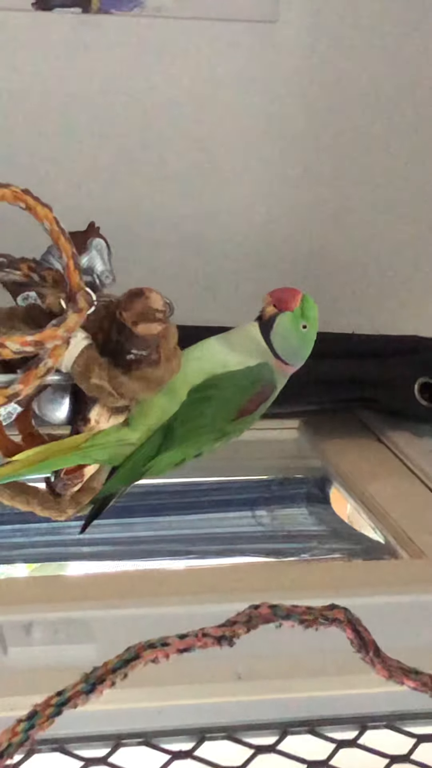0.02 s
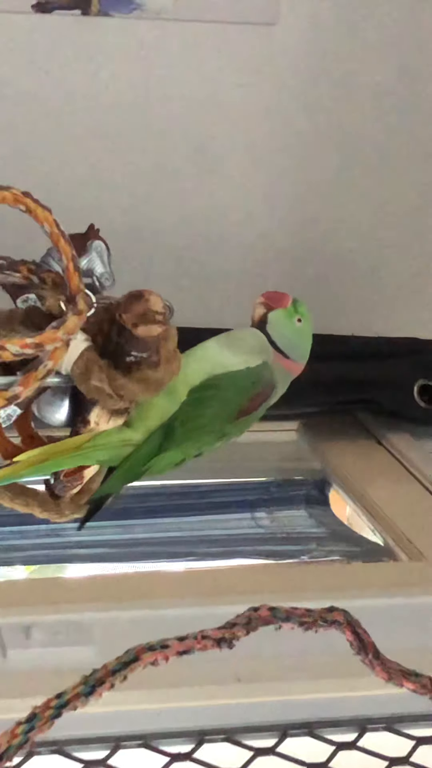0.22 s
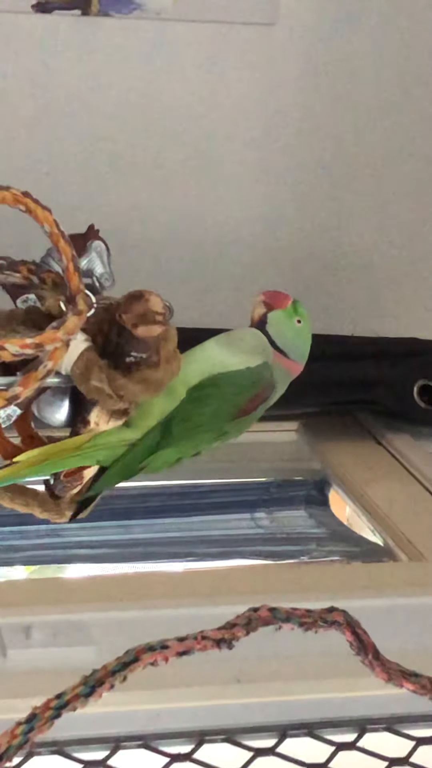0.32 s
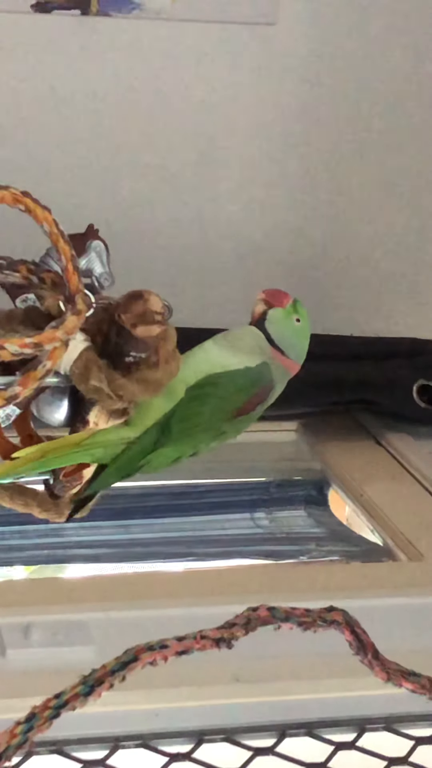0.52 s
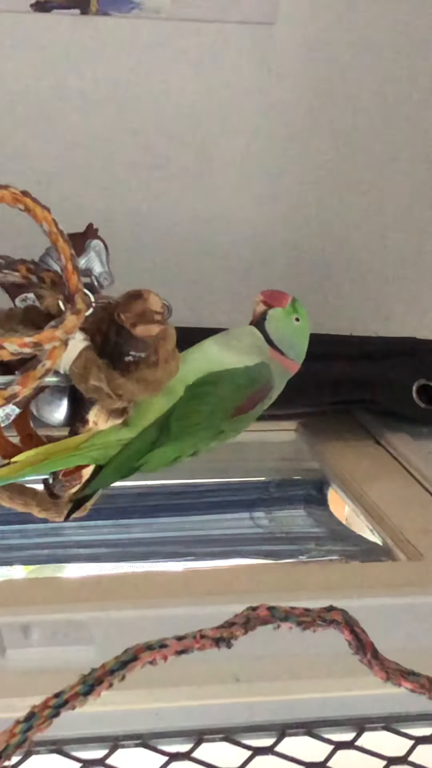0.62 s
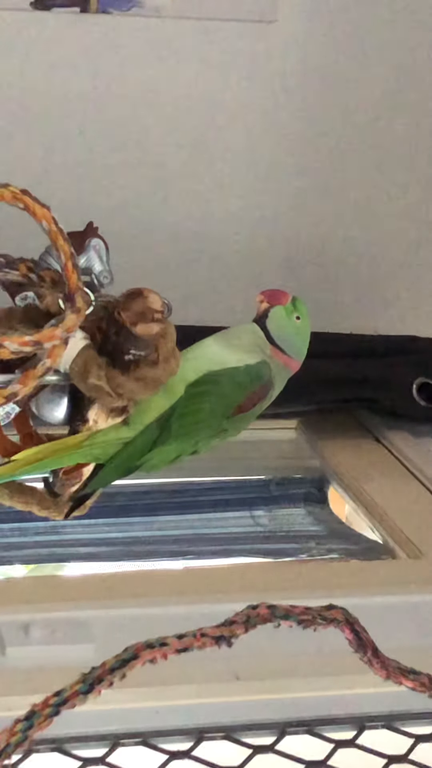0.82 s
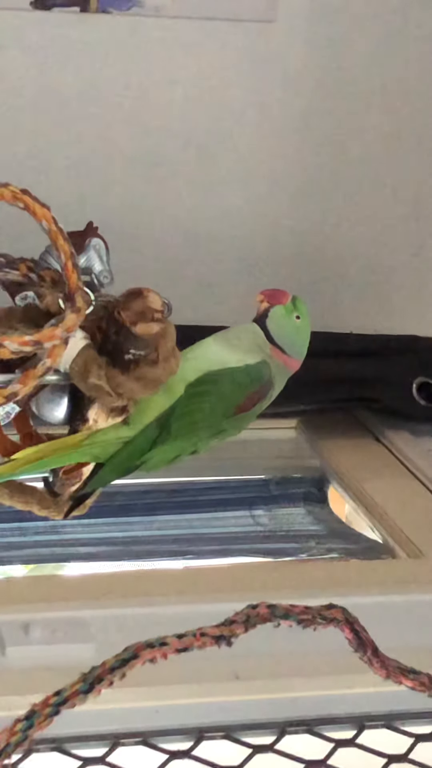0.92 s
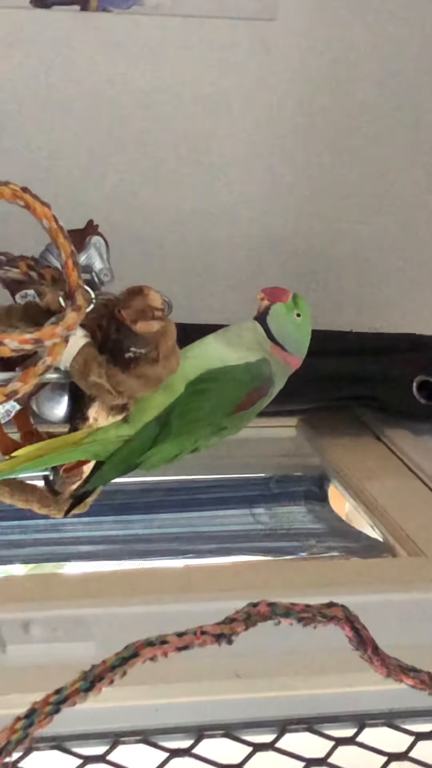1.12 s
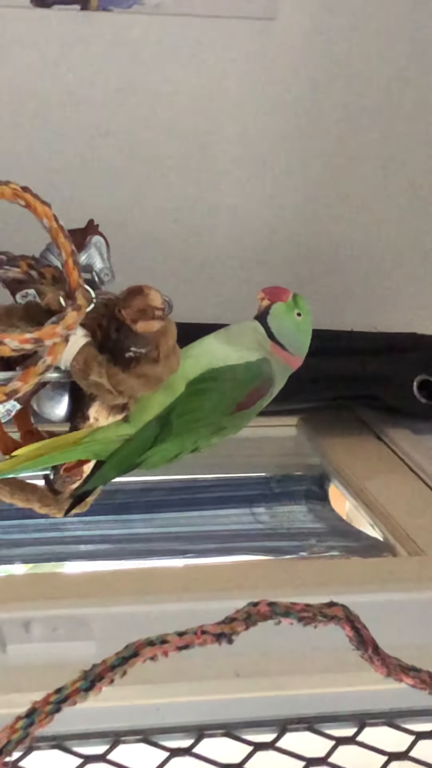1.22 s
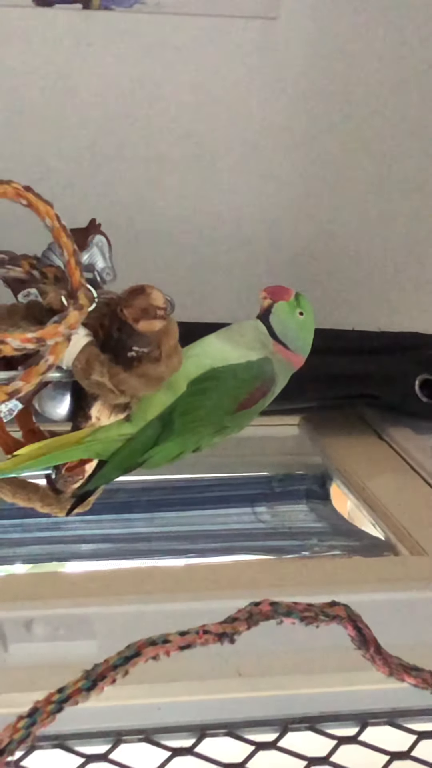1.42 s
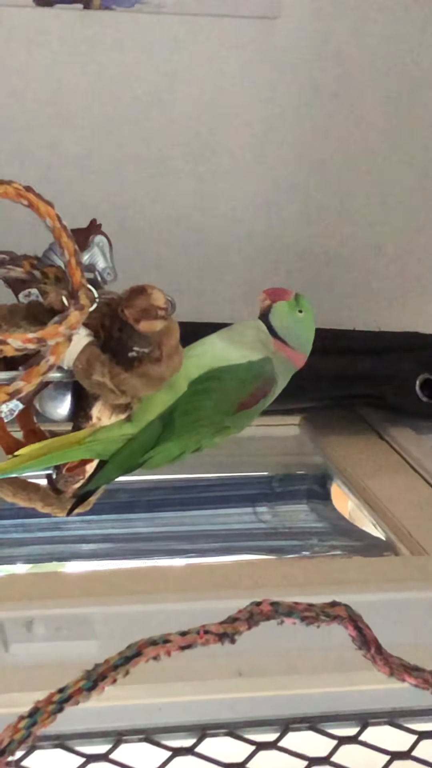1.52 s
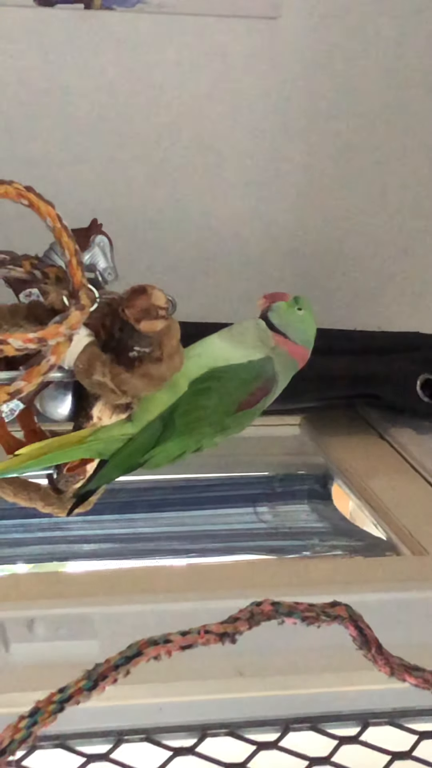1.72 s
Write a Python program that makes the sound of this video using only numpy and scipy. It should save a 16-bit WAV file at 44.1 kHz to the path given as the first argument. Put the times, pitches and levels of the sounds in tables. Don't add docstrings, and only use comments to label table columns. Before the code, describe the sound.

One piercing parrot call indoors: a fast rising and falling whoop, then a short fluttering held note

```python
import sys
import numpy as np
from scipy import signal
from scipy.fft import rfft, irfft
from scipy.io import wavfile
from scipy.ndimage import uniform_filter1d

SR = 44100
rng = np.random.default_rng(int(sys.argv[2]) if len(sys.argv) > 2 else 0)


def master(y):
    cut = np.clip(np.atleast_2d(y).T, -1, 1)
    pcm = np.round(cut * 32767)
    wavfile.write(sys.argv[1], SR, pcm.astype(np.int16))


def rack_gain(trim_db):
    fader = np.asarray(trim_db, float)
    return 10 ** (fader / 20)


N = 79380

# freq_hz, level_db
AIR_SPECTRUM = [(30, -22.5), (42, 6), (65, -3), (138, 0), (300, -5), (1020, -15), (2500, -27.5),
                (8000, -38.5)]
# time_s, pitch_hz
WHOOP_PITCH = [(.22, 990), (.227, 1130), (.238, 1490), (.25, 1640), (.262, 1990), (.274, 2270), (.29, 2325),
               (.304, 2280), (.326, 1610)]
# time_s, pitch_hz
HELD_PITCH = [(.348, 1432), (.374, 1478), (.392, 1545), (.412, 1584), (.445, 1628), (.47, 1636), (.5, 1630),
              (.535, 1636)]
# time_s, level_db, flutter_depth_db, hoarseness_db
WHOOP_EFFORT = [
    (.222, -20, -26.5, -44.5),
    (.232, -29, -12.5, -41),
    (.255, -17.5, -24, -35),
    (.283, -6.5, -22.5, -46.5),
    (.305, -9.5, -21.5, -32.5),
    (.33, -17.5, -28, -34.5),
]
# time_s, level_db, flutter_depth_db, hoarseness_db
HELD_EFFORT = [
    (.36, -24.5, -21.5, -39),
    (.39, -19.5, -28, -43),
    (.42, -16, -21, -50),
    (.47, -22, -22.5, -46),
    (.51, -15, -14.5, -49),
    (.535, -29, -23.5, -42.5),
]
# freq_hz, level_db
THROAT_RESPONSE = [
    [(650, -29), (1050, -11.5), (1700, -11.5), (2320, -6), (3400, 4), (4650, -7.5), (6000, -0.5),
     (15000, -35)],
    [(800, -30.5), (1600, -8), (2400, -9), (3270, 7), (4900, -6), (6500, -4), (8300, -13.5), (15000, -27)],
]
# freq_hz, width_hz, depth_db
THROAT_DIPS = [
    [(7000, 500, -16), (9800, 350, -24)],
    [(4050, 300, -12), (7300, 280, -22), (8900, 200, -16), (10650, 330, -30)],
]
# freq_hz, t60_s
ROOM_DECAY = [(1000, 0.65), (1600, 0.4), (3200, 0.4), (4900, 0.36), (7000, 0.32), (10000, 0.29),
              (16000, .22)]

AIR_DB, HISS_DB = -59, -80.5
ATTACK_S, RELEASE_S = .006, .01
FLUTTER_HZ = 384.5
FLUTTER_LOUDNESS_RATIO = 0.27
PITCH_JITTER, SHIMMER_DB = .0012, 2.5
WAVER_PER_HOARSENESS = 0.33
TILT_DB_PER_OVERTONE, TILT_PER_EFFORT_DB = 0.5, .05
OVERTONE_TOP_HZ = 19000
RASP_DB = 0
SCREECH_DB, SCREECH_HZ = 10.5, 9000
BEAK_TURN_S, BEAK_MOVE_S = .36, .04
ROOM_DB = -4.5
FIRST_ECHO_S, BUILD_S = .004, .01
MIC_CUT_HZ, TOP_HZ = 33, 15780


def rms_one(x):
    return x / np.sqrt(np.mean(x ** 2) + 1e-20)


def at_hz(points, hz):
    p = np.array(points)
    return np.interp(np.log(np.maximum(hz, 1)), np.log(p[:, 0]), p[:, 1])


def air():
    hz = np.fft.rfftfreq(N, 1 / SR)
    hum = irfft(rfft(rng.standard_normal(N)) * rack_gain(at_hz(AIR_SPECTRUM, hz)), N)
    return rack_gain(AIR_DB) * rms_one(hum) + rack_gain(HISS_DB) * rng.standard_normal(N)


def in_time(rows):
    s, *columns = np.transpose(rows)
    t = np.arange(N) / SR
    return [uniform_filter1d(np.interp(t, s, c), size=200) for c in columns]


def drift(rate_hz):
    r = np.exp(-2 * np.pi * rate_hz / SR)
    noise = rng.standard_normal(N + SR)
    return rms_one(signal.lfilter([1], [1, -2 * r, r * r], noise)[SR:])


def breath_rasp(phase, hoarse_db):
    noise = rng.standard_normal(N)
    high_pass = signal.butter(4, SCREECH_HZ, "high", fs=SR, output="sos")
    noise = noise + rack_gain(SCREECH_DB) * signal.sosfilt(high_pass, noise)
    return rack_gain(RASP_DB + hoarse_db) * noise * (1 + np.sin(phase))


def throat(x):
    hz = np.fft.rfftfreq(N, 1 / SR)
    spectrum = rfft(x)
    colours = []
    for response, dips in zip(THROAT_RESPONSE, THROAT_DIPS):
        gain_db = at_hz(response, hz)
        for dip_hz, width_hz, depth_db in dips:
            gain_db = gain_db + depth_db * np.exp(-((hz - dip_hz) / width_hz) ** 2)
        colours.append(irfft(spectrum * rack_gain(gain_db), N))
    wide, narrow = colours
    moved = np.clip((np.arange(N) / SR - BEAK_TURN_S) / BEAK_MOVE_S, 0, 1)
    return wide + moved * (narrow - wide)


def parakeet():
    t = np.arange(N) / SR
    pitch_hz, = in_time(WHOOP_PITCH + HELD_PITCH)
    level_db, flutter_db, hoarse_db = in_time(WHOOP_EFFORT + HELD_EFFORT)
    waver = WAVER_PER_HOARSENESS * rack_gain(hoarse_db) * drift(330)
    pitch_hz = pitch_hz * (1 + PITCH_JITTER * drift(60) + waver)

    flutter_phase = 2 * np.pi * np.cumsum(FLUTTER_HZ * (1 + 0.0028 * drift(30))) / SR
    phase = 2 * np.pi * np.cumsum(pitch_hz) / SR + rack_gain(flutter_db) * np.sin(flutter_phase)

    tilt_db = TILT_DB_PER_OVERTONE + TILT_PER_EFFORT_DB * (level_db + 12)
    voice = np.zeros(N)
    for k in range(1, 15):
        audible = k * pitch_hz < OVERTONE_TOP_HZ
        voice += rack_gain(tilt_db * k) * audible * np.sin(k * phase + k * k)
    voice *= 1 + FLUTTER_LOUDNESS_RATIO * rack_gain(flutter_db) * np.cos(flutter_phase + 2.985)
    voice += breath_rasp(phase, hoarse_db)

    attack = np.clip((t - WHOOP_EFFORT[0][0]) / ATTACK_S, 0, 1)
    release = np.exp(-np.maximum(t - HELD_EFFORT[-1][0], 0) / RELEASE_S)
    return throat(voice * attack * release * rack_gain(level_db + SHIMMER_DB * drift(50)))


def room(x):
    t = np.arange(SR) / SR
    white = rng.standard_normal((2, SR))
    echoes = np.zeros(SR)
    edges_hz = 500 * 2 ** np.arange(0, 5.5, .5)
    for k, (low, high) in enumerate(zip(edges_hz, edges_hz[1:])):
        band_pass = signal.butter(2, [low, high], "band", fs=SR, output="sos")
        band = signal.sosfilt(band_pass, white[k % 2])
        t60_s = at_hz(ROOM_DECAY, np.sqrt(low * high))
        echoes += band * rack_gain(-60 * t / t60_s)
    echoes *= np.clip((t - FIRST_ECHO_S) / BUILD_S, 0, 1)
    echoes /= np.sqrt(np.sum(echoes ** 2))
    return rack_gain(ROOM_DB) * signal.fftconvolve(x, echoes)[:N]


def scene():
    bird = parakeet()
    return (bird + room(bird) + air())[None]


def roll_off(x):
    return signal.sosfilt(signal.butter(12, 15970, fs=SR, output="sos"), x)


def record(dry):
    top_cut = np.clip((TOP_HZ - np.fft.rfftfreq(N, 1 / SR)) / 150, 0, 1)
    mix = irfft(rfft(dry) * top_cut, N)
    bass_cut = signal.butter(6, MIC_CUT_HZ, "high", fs=SR, output="sos")
    mix = signal.sosfilt(bass_cut, mix)
    return roll_off(mix)


dry = scene()
out = record(dry)
master(out)
```